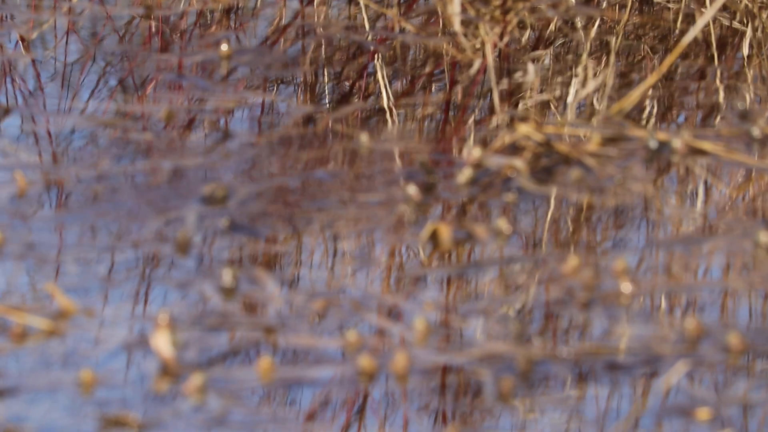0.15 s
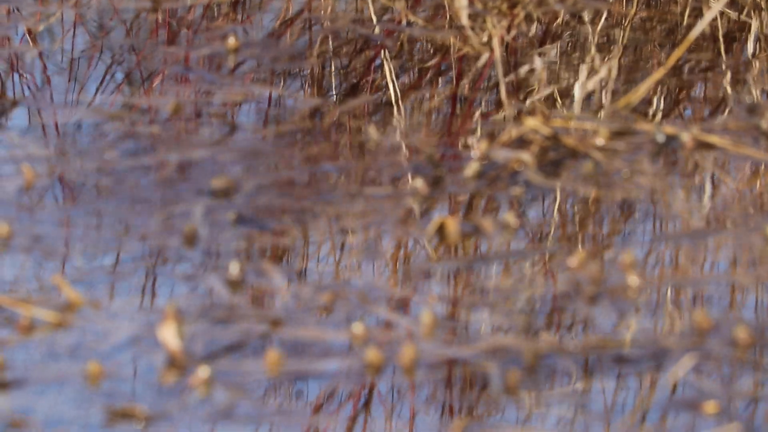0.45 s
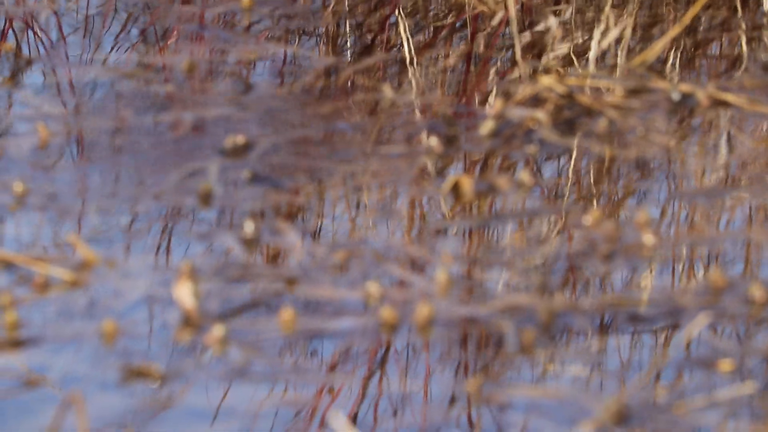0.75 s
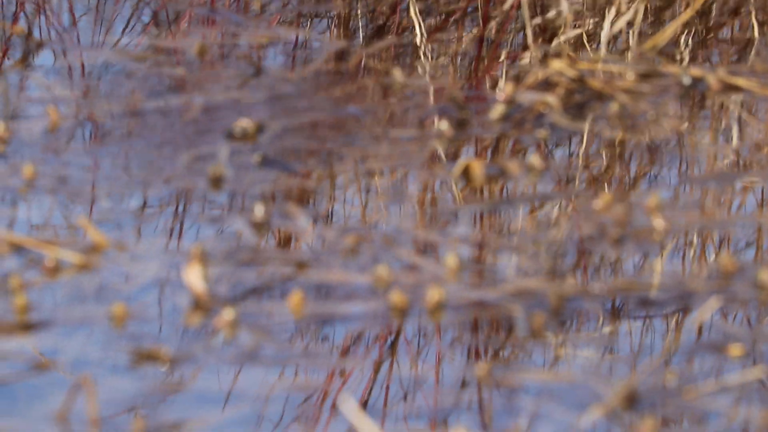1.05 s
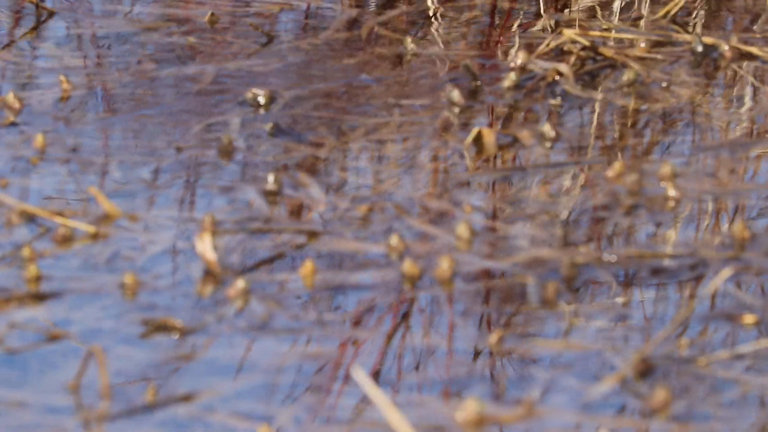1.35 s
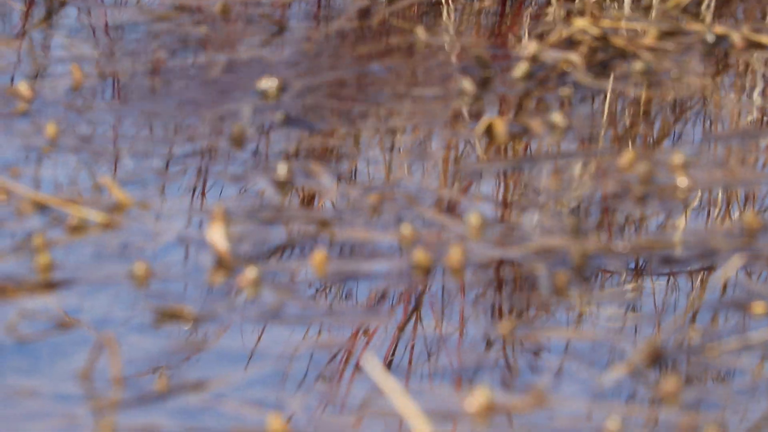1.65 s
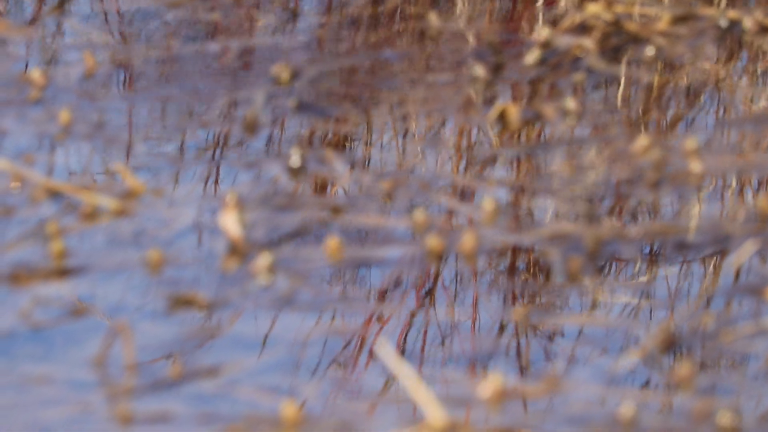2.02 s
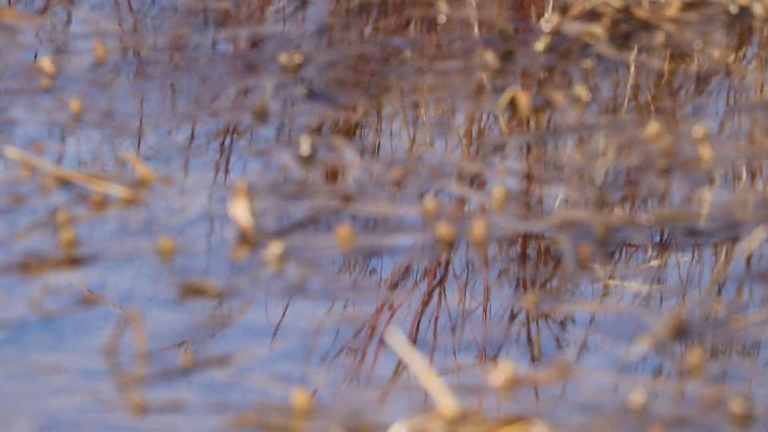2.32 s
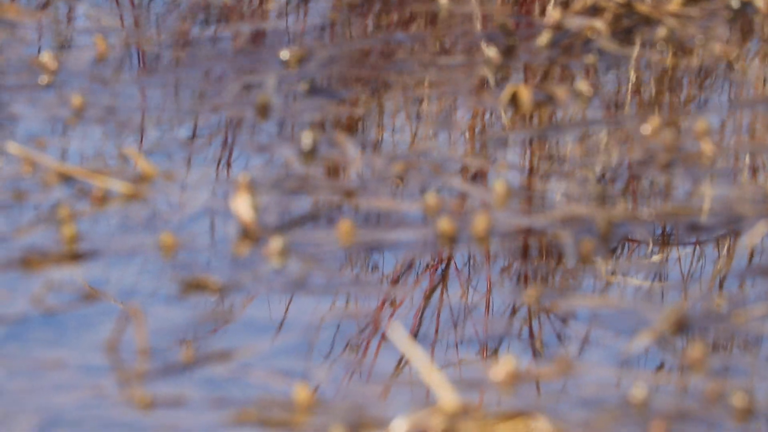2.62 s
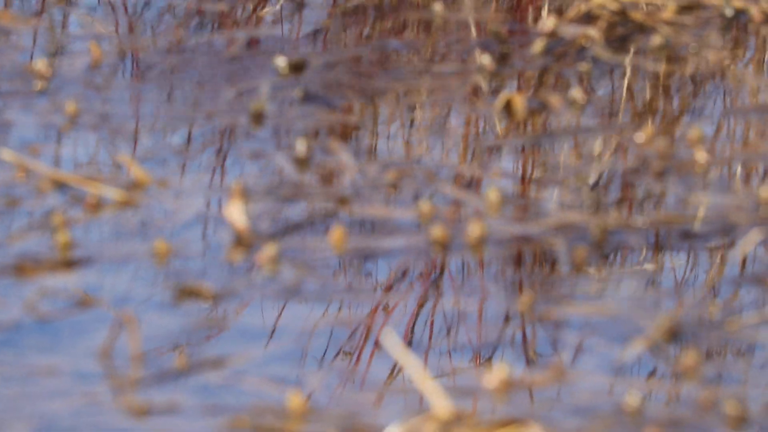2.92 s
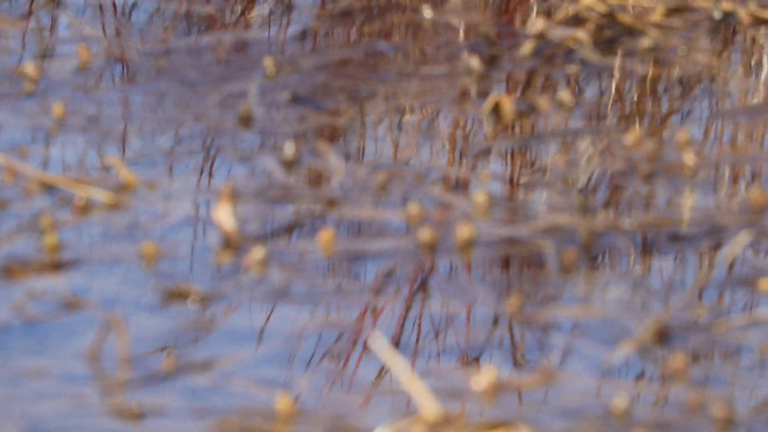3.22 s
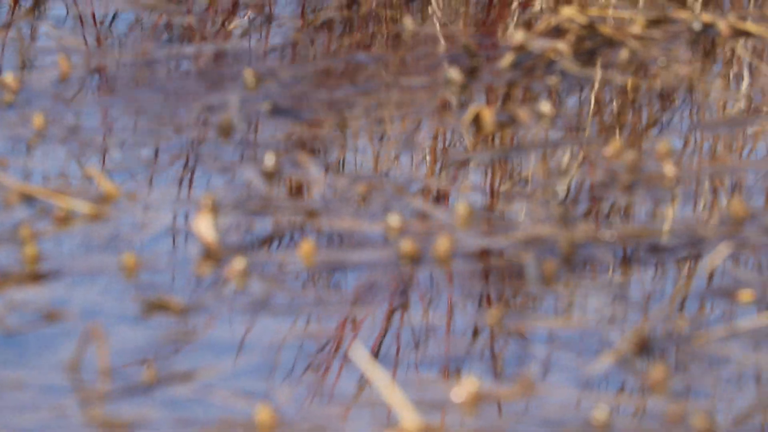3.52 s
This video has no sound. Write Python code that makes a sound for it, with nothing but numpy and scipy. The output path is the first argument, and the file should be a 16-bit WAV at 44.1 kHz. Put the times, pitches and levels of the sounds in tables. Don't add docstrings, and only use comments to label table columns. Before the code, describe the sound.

Small frogs call in a thick unbroken mass of quick bright pulses over a marshy pond.

```python
import sys
import numpy as np
from scipy import signal
from scipy.fft import rfft, irfft, next_fast_len
from scipy.io import wavfile
from scipy.ndimage import uniform_filter1d, minimum_filter1d, map_coordinates

SR = 44100
rng = np.random.default_rng(int(sys.argv[2]) if len(sys.argv) > 2 else 0)


def volts(x):
    e = np.asarray(x, float) / 20
    return 10 ** e


def to_wav(s):
    ch = np.atleast_2d(s).T
    pcm = np.round(np.clip(ch, -1, 1) * 32767)
    wavfile.write(sys.argv[1], SR, pcm.astype(np.int16))


N = 161847

# t/s, level/dB, starting pitch f/Hz
CHORUS_EFFORT = [
    (0, -17, 1617),
    (.45, -18, 1631),
    (.9, -18, 1601),
    (1.35, -19.5, 1599),
    (1.8, -18, 1608),
    (2.25, -18.5, 1617),
    (2.6, -18, 1595),
    (3.1, -18.5, 1623),
    (3.67, -18.5, 1576),
]
# multiple of the fundamental [1], level/dB
FAR_OVERTONES = [(1, -33), (2, -8.5), (3, -31.5), (4, -39.5), (5, -56), (6, -67.5), (7, -70), (8, -57.5)]
# f/Hz, level/dB
RASP_SPECTRUM = [(600, -68.5), (1000, -20), (1300, 0), (1550, -0.5), (1880, 3), (2300, -3.5), (2800, 2),
                 (4500, -5.5), (6200, -11.5), (8200, -25.5), (12000, -35), (16000, -39)]
# f/Hz, level/dB
AIR_SPECTRUM = [(20, -4.5), (200, -7), (500, -9), (900, -5.5), (3000, -22), (9000, -31.5), (16000, -30.5)]
# t/s, half length/s, level/dB
GUSTS = [(0.095, 0.049, -51), (0.205, 0.019, -49.5), (0.3, 0.054, -50.5), (0.646, 0.026, -63),
         (0.786, 0.061, -55.5), (1.316, 0.023, -60), (1.345, 0.014, -47), (2.576, 0.054, -66),
         (2.67, 0.014, -50), (2.759, 0.011, -52), (2.864, 0.061, -57), (3.026, 0.055, -58),
         (3.157, 0.055, -62), (3.457, 0.046, -57.5), (3.608, 0.039, -55.5)]
# f/Hz, level/dB
BUFFET_SPECTRUM = [(20, -8.5), (50, 6), (110, -0.5), (250, -14.5), (400, -33), (800, -87.5)]
# t/s, peak level/dB, loudest tone f/Hz
STRONG_EARLY = [(0.0313, -19, 3400), (0.0478, -6.5, 3660), (0.1406, -6.5, 3870), (0.2149, -17, 3870),
                (0.2663, -14, 3830), (0.2853, -6.5, 3660), (0.2987, -9.5, 3320), (0.3257, -5, 3380),
                (0.4174, -7, 3900), (0.4464, -10.5, 3610), (0.5043, -7.5, 3800), (0.5407, -7, 3780),
                (0.5901, -11, 3850), (0.6315, -7, 3630), (0.6883, -5, 3700), (0.7198, -5.5, 3150),
                (0.7637, -7, 3210), (0.7821, -7, 3210), (0.7996, -8, 3300), (0.8275, -3.5, 3630),
                (0.8754, -3.5, 3340), (0.9153, -15.5, 3290), (0.9343, -3, 3410), (0.9797, -6, 3300),
                (1.0161, -8, 3520), (1.0964, -5.5, 3600), (1.1298, -3.5, 3350), (1.1952, -4, 3600),
                (1.2396, -5.5, 3520), (1.255, -4.5, 3490), (1.279, -7.5, 3420), (1.3229, -3, 3670),
                (1.3418, -4.5, 3490), (1.4331, -7.5, 3400), (1.4551, -6.5, 3690), (1.5015, -5, 3270),
                (1.5309, -6.5, 3300), (1.5589, -9, 3350), (1.5783, -6.5, 3350), (1.6307, -10, 3760),
                (1.6686, -5, 3350), (1.707, -6.5, 3400), (1.7345, -5.5, 3520), (1.7804, -4, 3610),
                (1.8208, -10, 3400), (1.8482, -19, 3410)]
STRONG_LATE = [(1.8654, -7.5, 3300), (2.0004, -5.5, 3220), (2.0699, -4, 3650), (2.1133, -8, 3300),
               (2.1672, -5, 3500), (2.1996, -7, 3340), (2.2136, -6.5, 3640), (2.2839, -7, 3580),
               (2.3602, -4, 3780), (2.383, -7.5, 3180), (2.4056, -5, 3830), (2.4919, -3, 3800),
               (2.5478, -8, 3500), (2.5683, -5, 3680), (2.6008, -11.5, 3370), (2.6371, -8, 3140),
               (2.6665, -4.5, 3340), (2.7045, -7, 3540), (2.7533, -10.5, 3240), (2.7972, -6.5, 3300),
               (2.902, -0.5, 3360), (2.9226, -13.5, 3650), (2.9614, -5, 3590), (3.0262, -3, 3650),
               (3.0468, -15, 3730), (3.0706, -6, 3630), (3.0925, -8, 3760), (3.1105, -6, 3570),
               (3.1509, -8.5, 3480), (3.1714, -5.5, 3600), (3.1927, -18, 3400), (3.2367, -5, 3350),
               (3.2542, -5, 3740), (3.2747, -6.5, 3600), (3.2991, -7, 3680), (3.3415, -6, 3680),
               (3.4063, -9.5, 3160), (3.4373, -4, 3205), (3.5021, -3.5, 3330), (3.5243, -7, 3180),
               (3.568, -6.5, 3430), (3.5959, -8.5, 3190), (3.6114, -4.5, 3650), (3.6453, -13.5, 3260)]
# t/s, pulses [1], first gap/s, pitch f/Hz
NEAR_TRILLS = [(.098, 6, .0537, 1800), (.413, 6, .0412, 1790), (.936, 6, .0504, 1780),
               (1.343, 2, .056, 1830), (1.435, 3, .049, 1800), (1.655, 3, .057, 1790),
               (1.768, 5, .0478, 1790), (2.008, 2, .062, 1820), (2.139, 3, .078, 1820),
               (2.344, 4, .0438, 1800), (2.444, 3, .052, 1800), (2.595, 6, .0567, 1810),
               (3.073, 3, .042, 1790), (3.210, 8, .0473, 1790)]
# multiple of the fundamental [1], level/dB
NEAR_OVERTONES = [(1, -18), (2, 0), (3, -22), (4, -33), (5, -53), (6, -50), (7, -54), (8, -43)]
# f/Hz, level/dB
TICK_SPECTRUM = [(3000, -62), (5000, 4), (8000, -11.5), (11000, -23), (15000, -20)]
# t/s, f/Hz, peak level/dB
CLUCK_NOTES = [(.46, 730, -66), (.53, 924, -55.5), (.59, 867, -56), (.625, 933, -58), (.97, 780, -62),
               (1.03, 837, -53), (1.09, 996, -52.5), (1.16, 1020, -57.5), (1.30, 790, -56),
               (1.36, 772, -65), (1.42, 940, -52.5), (1.50, 1045, -54), (1.55, 880, -58), (1.66, 790, -56),
               (1.71, 874, -53.5), (1.77, 962, -50), (1.97, 816, -53.5), (2.02, 866, -55),
               (2.08, 945, -54.5), (2.18, 935, -58), (2.27, 830, -55.5), (2.325, 957, -53.5),
               (2.38, 970, -54), (2.55, 790, -59.5), (2.73, 960, -55.5), (3.07, 953, -51),
               (3.15, 832, -48.5), (3.36, 946, -52), (3.44, 825, -53), (3.54, 848, -45.5), (2.62, 900, -59),
               (2.68, 767, -63), (3.26, 700, -58.5), (3.30, 720, -59), (3.33, 835, -56), (3.485, 720, -59),
               (3.51, 920, -50), (3.605, 1007, -50.5)]
# t/s, length/s, start f/Hz, end f/Hz, level/dB
BIRD_NOTES = [
    (0.616, 0.21, 6540, 7160, -54),
    (1.163, 0.031, 4950, 5000, -37),
    (1.377, 0.077, 5080, 5020, -41.5),
    (1.455, 0.02, 7200, 5170, -40),
    (1.609, 0.084, 5000, 4950, -40.5),
    (1.686, 0.024, 7270, 5140, -42),
    (1.84, 0.044, 4950, 4880, -42),
    (1.9, 0.021, 7200, 5450, -40),
]
# from t/s, to t/s, peak level/dB
HUM_SPELLS = [
    (0.714, 1.286, -66.5),
    (1.398, 1.806, -62.5),
    (1.828, 2.228, -64),
    (2.318, 3.614, -63),
]
# f/Hz, level/dB
SCATTER_SPECTRUM = [(100, 0), (4000, 0), (8000, -8), (16000, -20)]

ATTACK_S, RELEASE_S, SAG, SHARPEN = .0011, .0014, 0.012, 0.25
STRONG_RISE_S = 0.0016


def unit(x):
    return x / np.sqrt(np.mean(x ** 2) + 1e-20)


def wobble(rate):
    knots = rng.standard_normal(int(N * rate / SR) + 4)
    return map_coordinates(knots, [np.arange(N) * rate / SR])


def coloured(x, points):
    size = next_fast_len(N + 8192)
    f, db = np.transpose(points)
    log_hz = np.log(np.fft.rfftfreq(size, 1 / SR) + 1)
    gain = volts(np.interp(log_hz, np.log(f + 1), db))
    return irfft(rfft(x, size) * gain, size)[..., :N]


def bursts(s, hz, db, pan_db, lag, tones, attack, release, rise=0):
    t = np.arange(-int(3.2 * attack * SR), int(3.4 * release * SR)) / SR
    shape = -.5 * (t / np.where(t < 0, attack, release)) ** 2
    at = np.round(s * SR).astype(int)[:, None] + np.round(t * SR).astype(int)
    keep = (at >= 0) & (at < N)
    draw = rng.standard_normal((len(s), 2 * len(tones)))
    glide = t - SAG * t * np.abs(t) / release + rise * t * t / release
    out = []
    for side in (1, -1):
        phase = 2 * np.pi * hz[:, None] * (glide + side * lag[:, None])
        wave = 0
        for i, (k, level) in enumerate(tones):
            strength = volts(level + 0.95 * draw[:, [2 * i]])
            envelope = np.exp(shape * (1 + SHARPEN * abs(k - 2)))
            wave = wave + strength * envelope * np.sin(k * phase + 3.21 * draw[:, [2 * i + 1]])
        wave = wave * volts(db + side * pan_db / 2)[:, None]
        out.append(np.bincount(at[keep], wave[keep], N))
    puff = np.exp(1.6 * shape) * volts(db)[:, None]
    return np.array(out), np.bincount(at[keep], puff[keep], N)


def crowd():
    trills, pulses = 290, 16
    d = rng.standard_normal((trills, 6))
    p = rng.standard_normal((trills, pulses, 3))
    k = np.arange(pulses)

    start = (np.arange(trills) + .5 * d[:, 0]) / trills * (N / SR + 1) - 1
    gap = .046 * np.exp(0.17 * d[:, [1]])
    s = start[:, None] + gap * k + .0012 * k * (k - 1) / 2 + .0025 * p[..., 2]

    when, effort_db, low_hz = np.transpose(CHORUS_EFFORT)
    spread = 0.054 * np.clip(d[:, [2]], -2, 2)
    hz = np.interp(s, when, low_hz) * np.exp(spread + 0.0099 * k + 0.0089 * p[..., 0])
    highest_hz = 1960
    hz = np.minimum(hz, highest_hz + 0.25 * (hz - highest_hz))

    swell_db = 2 * (1 - k / pulses) ** 2
    db = 1.8 * d[:, [3]] + 1.8 * p[..., 1] - swell_db
    yield_db, yield_s = 7, .004
    strong = np.vstack((STRONG_EARLY, STRONG_LATE))[:, 0] + STRONG_RISE_S
    db = db - yield_db * np.exp(-.5 * ((s[..., None] - strong) / yield_s) ** 2).max(-1)

    pan_db = 4.5 * d[:, [4]] + 0 * k
    lag = .000025 * d[:, [5]] + 0 * k
    voice, puff = bursts(s.ravel(), hz.ravel(), db.ravel(), pan_db.ravel(), lag.ravel(),
                         FAR_OVERTONES, ATTACK_S, RELEASE_S)

    a, b = rng.standard_normal((2, N))
    wide, steady = 0.32, 0.64
    noise = np.array([a + wide * b, a - wide * b])
    rasp = coloured((unit(puff) + steady) * noise, RASP_SPECTRUM)

    size = int(.06 * SR)
    power = uniform_filter1d((voice ** 2).mean(0), size=size)
    power = np.abs(uniform_filter1d(power, size=size))
    voice = voice / np.sqrt(power + 1e-9)
    effort_db = np.interp(np.arange(N) / SR, when, effort_db)
    return volts(effort_db) * voice + volts(-35.5) * unit(rasp)


def air():
    shared, left, right = rng.standard_normal((3, N))
    alike = .55
    hiss = coloured(np.array([alike * shared + left, alike * shared + right]), AIR_SPECTRUM)
    return volts(-62.5) * unit(hiss)


def wind():
    t = np.arange(N) / SR
    strength = volts(-77.5)
    for s, half, db in GUSTS:
        strength = strength + volts(db) * np.exp(-.5 * ((t - s) / half) ** 2)
    shared, left, right = rng.standard_normal((3, N))
    alike = 0.36
    lumps = volts(4 * np.array([wobble(36), wobble(14)]))
    buffet = coloured(np.array([alike * shared + left, alike * shared + right]), BUFFET_SPECTRUM)
    return strength * unit(lumps * buffet)


def strong_pulses():
    s, db, hz = np.transpose(np.vstack((STRONG_EARLY, STRONG_LATE)))
    return bursts(s + STRONG_RISE_S, hz / 2, db + 4.5, 0 * s, 0 * s, FAR_OVERTONES, ATTACK_S, RELEASE_S)[0]


def near_trills():
    slows_s, rise = .0013, .003
    rows = []
    for s, n, gap, hz in NEAR_TRILLS:
        for k in range(int(n)):
            rows.append((s + gap * k + slows_s * k * (k - 1) / 2, hz * (1 + rise * k), -13))
    s, hz, db = np.transpose(rows)
    trills, puff = bursts(s, hz, db, 0 * s, 0 * s, NEAR_OVERTONES, ATTACK_S, RELEASE_S)
    ticks = coloured(puff * rng.standard_normal((2, N)), TICK_SPECTRUM)
    return trills + volts(-53) * unit(ticks)


def clucks():
    s, hz, db = np.transpose(CLUCK_NOTES)
    partials = [(0.96, -1), (1.4, -3), (0.91, -9.5)]  # ratio, dB
    attack, release, rise = 0.01, 0.0065, .008
    return bursts(s, hz, db + 3, 1.8 + 0 * s, 0 * s, partials, attack, release, rise)[0]


def bird():
    out = np.zeros(N)
    for s, length, from_hz, to_hz, db in BIRD_NOTES:
        u = np.arange(int(length * SR)) / (length * SR)
        phase = 2 * np.pi * np.cumsum(from_hz * (to_hz / from_hz) ** u) / SR
        out[round(s * SR):][:len(u)] += volts(db) * np.sin(np.pi * u) ** 0.25 * np.sin(phase)
    return out


def hum():
    t = np.arange(N) / SR
    fade_s = .034
    on = np.zeros(N)
    for start, end, db in HUM_SPELLS:
        on += volts(db) * np.clip(np.minimum(t - start, end - t) / fade_s, 0, 1)
    level = on * volts(1.3 * wobble(4.6))
    return level * np.sin(2 * np.pi * np.cumsum(129 + .5 * wobble(3.8)) / SR)


def reeds(x):
    out, size = np.zeros((2, N + SR)), 2048
    t = np.arange(SR // 6) / SR
    t60_s, alike = .12, 1.2
    padded = np.pad(x, ((0, 0), (size, size)))
    for a in range(0, N, size):
        own, shared = rng.standard_normal((2, len(t))), rng.standard_normal(len(t))
        tail = (own + alike * shared) * volts(-60 * t / t60_s) * (t > .002)
        stretch = padded[:, a:a + 2 * size] * np.hanning(2 * size)
        part = signal.fftconvolve(stretch, tail / np.linalg.norm(tail[0]), axes=1)
        lo = max(a - size, 0)
        out[:, lo:a - size + part.shape[1]] += part[:, lo - a + size:]
    return coloured(out[:, :N], SCATTER_SPECTRUM)


def limited(x):
    need = np.minimum(1, .8 / (np.abs(x).max(0) + 1e-9))
    return x * uniform_filter1d(minimum_filter1d(need, size=441), size=221)


def scene():
    life = crowd() + strong_pulses() + near_trills() + clucks() + bird()
    return life + volts(-6) * reeds(life) + air() + wind() + hum()


def band_limit(x):
    return signal.sosfilt(signal.butter(12, 16460, fs=SR, output="sos"), x)


def record(dry):
    left_over_right_db = -2.6
    x = limited(dry * volts(left_over_right_db * np.array([[.5], [-.5]])))
    edge_s = .0003
    x = x * np.clip(np.minimum(np.arange(N) + 1, N - np.arange(N)) / (edge_s * SR), 0, 1)
    top_hz = 15760
    mix = coloured(x - .008 * x ** 3, [(1, 0), (top_hz, 0), (top_hz + 30, -120)])
    return band_limit(mix)


dry = scene()
out = record(dry)
to_wav(out)
```